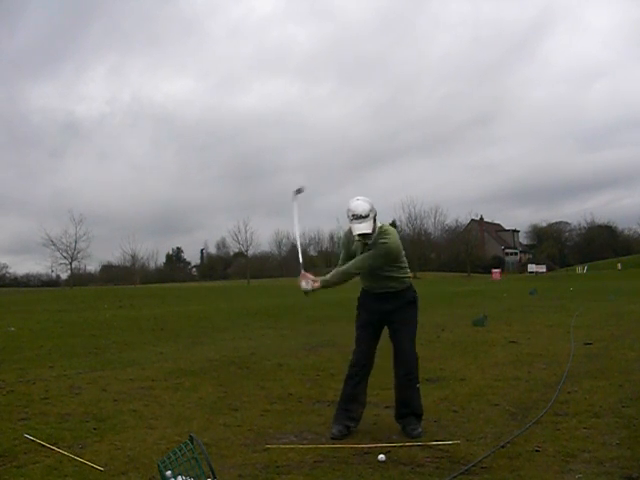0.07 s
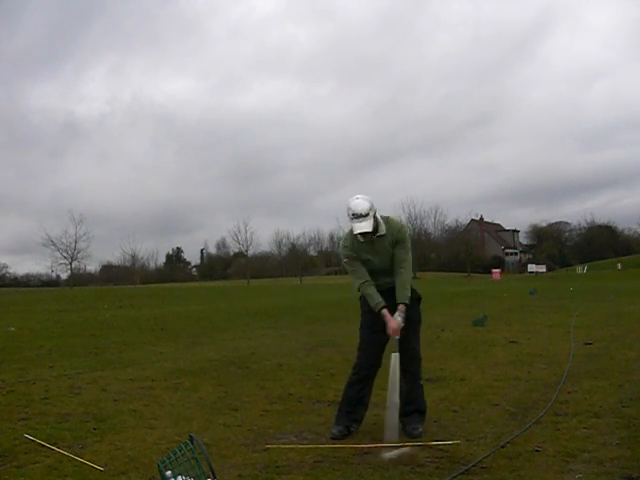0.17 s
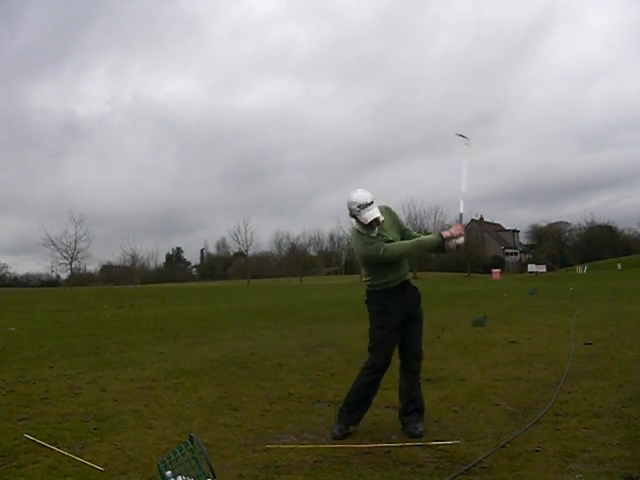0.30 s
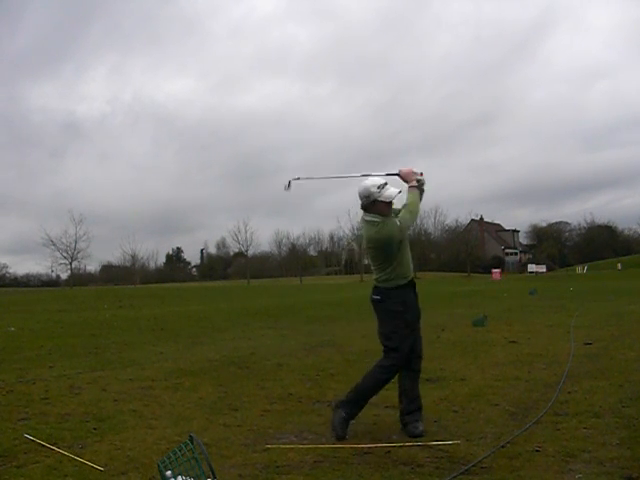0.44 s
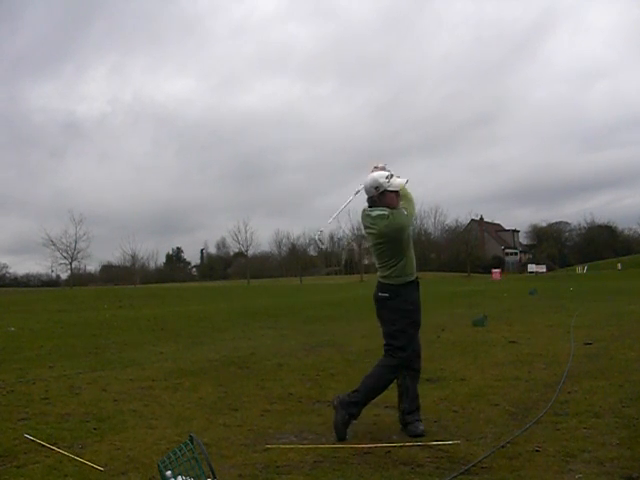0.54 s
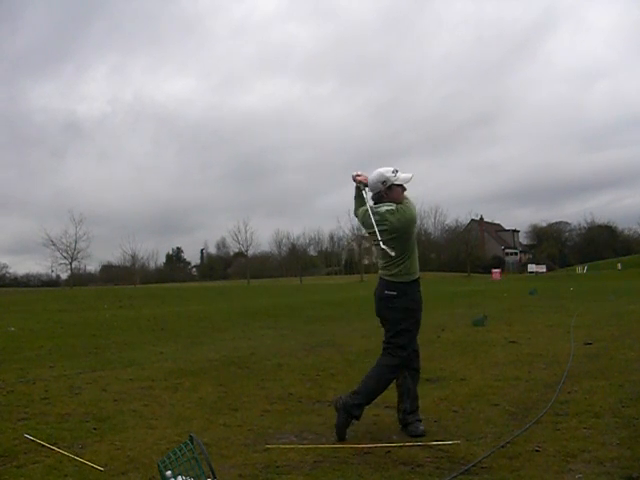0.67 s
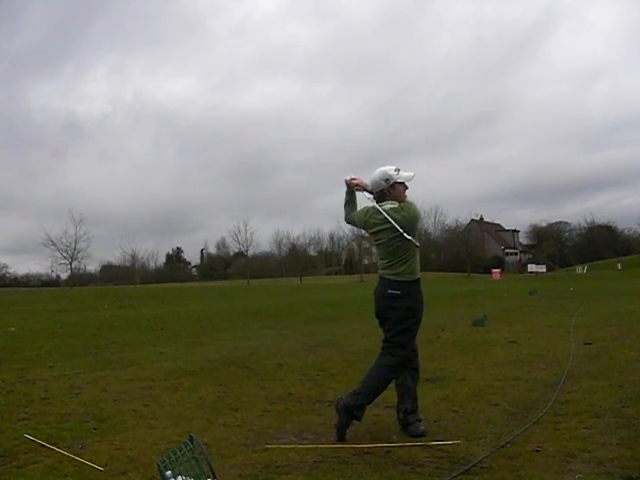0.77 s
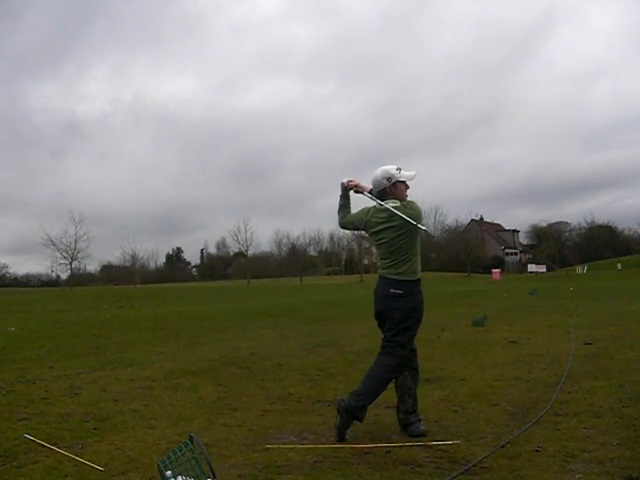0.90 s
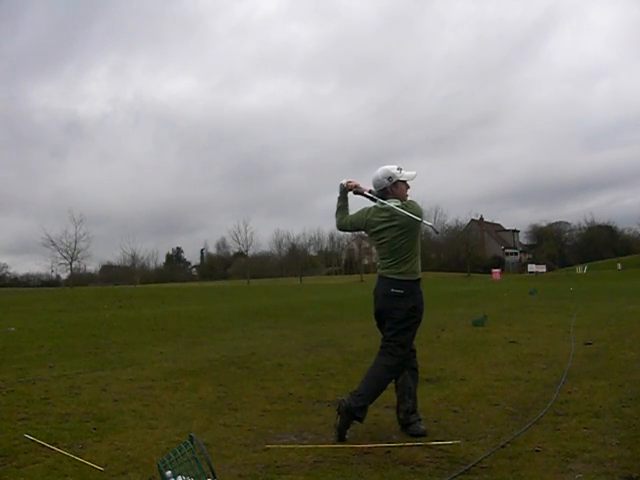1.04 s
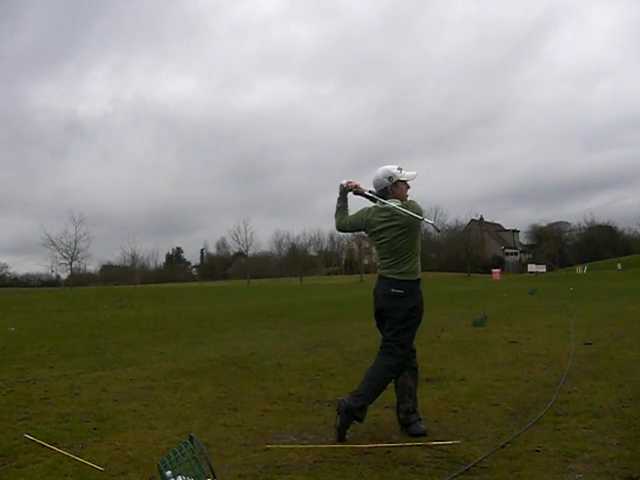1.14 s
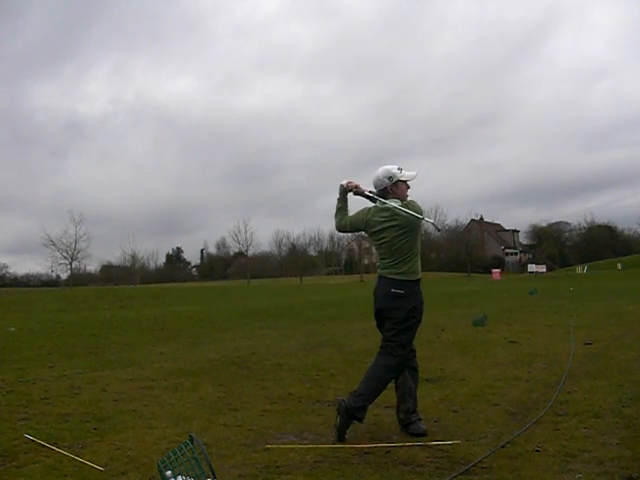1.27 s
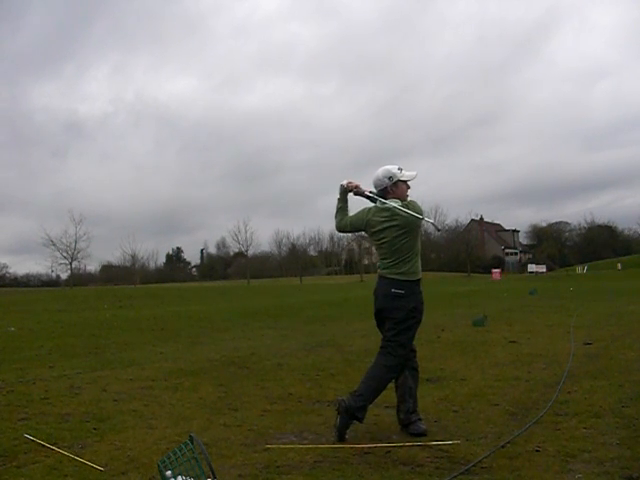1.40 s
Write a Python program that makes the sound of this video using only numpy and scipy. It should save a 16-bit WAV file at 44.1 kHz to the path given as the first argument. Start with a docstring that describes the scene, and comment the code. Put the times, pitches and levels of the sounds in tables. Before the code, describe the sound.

A golf iron whooshes quickly downward, strikes the ball with one loud dry crack and a brief metallic click, and scatters turf; then only low airy wash and barely audible birds, close microphone on an open range.

```python
"""An open range, small camera close to the player: a far wash of air in light wind and a faint camera whine.
A far tick, then an iron club swishes down: noise in tone, overtone and hiss that grows with speed.
Knocks ring the club head and shaft, the ball cracks off the face as one short wavelet with a bright spit,
and torn turf flies as grains of noise. The camera's gain control ducks after the crack and creeps back up.
From about a second in, small birds whistle far off as gliding sines, around a second faint tick."""
import sys
import numpy as np
from scipy import signal
from scipy.fft import rfft, irfft
from scipy.io import wavfile
from scipy.ndimage import uniform_filter1d

SR = 44100
rng = np.random.default_rng(int(sys.argv[2]) if len(sys.argv) > 2 else 0)


def dump(signal):
    """Clip the signal to [-1, 1] and save it as 16-bit WAV at the path in sys.argv[1]."""
    limited = np.clip(np.atleast_2d(signal).T, -1, 1)
    pcm = np.round(limited * 32767).astype(np.int16)
    wavfile.write(sys.argv[1], SR, pcm)


def invert_db(level):
    """Linear amplitude ratio for a level in decibels (20 dB per decade), elementwise."""
    return 10 ** (np.asarray(level, dtype=float) / 20)


N = 63945  # length in samples
T = np.arange(N) / SR  # time in seconds
HIT_S = .21004  # club face meets ball
RADIATES_ABOVE_HZ = 805  # club and crack are thinned below this


def evened(x):
    """Scales to rms 1."""
    return x / np.sqrt(np.mean(x ** 2) + 1e-20)


def read(points, hz):
    """Reads a spectrum table on a log-frequency axis."""
    table_hz, value = np.transpose(points)
    return np.interp(np.log(hz + 1), np.log(table_hz + 1), value)


def coloured(x, points):
    """Filters by a spectrum table, then scales to rms 1."""
    gain = invert_db(read(points, np.fft.rfftfreq(len(x), 1 / SR)))
    return evened(irfft(rfft(x) * gain, len(x)))


def resonate(x, hz, width_hz):
    """A resonance that may follow a moving frequency: shift down to 0 Hz, smooth, shift back."""
    turn = np.exp(2j * np.pi * np.cumsum(hz * np.ones(len(x))) / SR)
    r = np.exp(-np.pi * width_hz / SR)
    return 2 * (turn * signal.lfilter([1 - r], [1, -r], x / turn)).real


def dying(start_s, t60_s, rise_s):
    """Envelope: short straight rise under an exponential fall of 60 dB in t60_s."""
    t = np.maximum(T - start_s, 0)
    return np.minimum(t / rise_s, 1) * invert_db(np.maximum(-60 * t / t60_s, -200))


# far air over the open range, heaviest in the bass: pitch_hz, relative level_db
WASH_SPECTRUM = [(12, -30.5), (25, -9.5), (40, -7), (62, -3), (95, 0), (160, -2), (250, -5), (400, -10),
                 (630, -14), (1000, -15.5), (2500, -23), (5000, -27.5), (8000, -35.5), (10000, -41.5),
                 (13000, -49), (16000, -53)]


def wash():
    """Far wash of air: random short-time spectra whose patches drift gently in level, then coloured."""
    wash_db, patch_rms_db = -45, 0.4646
    frames = N // 256 + 5
    real, imaginary, patches = rng.standard_normal((frames, 513, 3)).T
    patches = uniform_filter1d(patches, size=10, axis=0)  # across frequency
    patches = evened(uniform_filter1d(patches, size=12, axis=1))  # across time
    spectra = (real + 1j * imaginary) * invert_db(patch_rms_db * patches)
    air = signal.istft(spectra, nperseg=1024, noverlap=768)[1][:N]
    return invert_db(wash_db) * coloured(air, WASH_SPECTRUM)


def whine():
    """A steady high tone from the camera itself, its level beating lightly."""
    whine_hz, whine_db, beat_hz, beat_depth = 14390, -87, 30, .3
    beat = 1 + beat_depth * np.sin(2 * np.pi * beat_hz * T)
    return np.sqrt(2) * invert_db(whine_db) * beat * np.sin(2 * np.pi * whine_hz * T)


# faint ticks far from the microphone: start_s, level_db (before the envelope), pitch_hz
FAR_TICKS = [(0.025, -47.5, 3780), (1.196, -51.5, 4400)]


def ticks():
    """Small far ticks: noise through a broad resonance, dying at once."""
    width_hz, t60_s, rise_s = 2340, 0.0343, 0.0013
    out = np.zeros(N)
    for start_s, level_db, pitch_hz in FAR_TICKS:
        noise = resonate(rng.standard_normal(N), pitch_hz, width_hz)
        noise = evened(resonate(noise, pitch_hz, width_hz))
        out += invert_db(level_db) * dying(start_s, t60_s, rise_s) * noise
    return out


# club head speed through the downswing and follow-through: time_s, speed (share of nominal top speed)
SWING_SPEED = [(.1, 0.24), (.145, 0.35), (.162, 0.847), (.185, 0.973), (.192, 1.01), (.207, 0.926),
               (.23, 0.786), (.26, 0.682), (.32, 0.16)]
# hiss of air off the moving club: pitch_hz, relative level_db
SWISH_SPECTRUM = [(500, -8.5), (1500, 0), (3000, -2.5), (6000, -7.5), (10000, -17.5), (16000, -29.5)]


def swing():
    """Air shed by the shaft: a fuzzy tone and a wide overtone that rise with speed, and hiss; all grow with it."""
    # levels hold at speed share 1; each power is how steeply the amplitude grows with speed
    shaft_hz, shaft_width_hz, shaft_db, shaft_power = 531.8, 101, -38, 2.85
    overtone_ratio, overtone_width_hz, overtone_db, overtone_power = 2.025, 327, -45.5, 1.84
    swish_db, swish_power = -49, 5.86
    speed = np.clip(np.interp(T, *np.transpose(SWING_SPEED), left=0, right=0), 0, 2)
    tone_noise, overtone_noise, hiss_noise = rng.standard_normal((N, 3)).T
    tone_hz = shaft_hz * speed
    tone = resonate(tone_noise, tone_hz, shaft_width_hz)
    tone = evened(resonate(tone, tone_hz, 2 * shaft_width_hz))
    overtone_hz = overtone_ratio * tone_hz
    overtone = resonate(overtone_noise, overtone_hz, overtone_width_hz)
    overtone = evened(resonate(overtone, overtone_hz, overtone_width_hz))
    hiss = coloured(hiss_noise, SWISH_SPECTRUM)
    return (invert_db(shaft_db) * speed ** shaft_power * tone
            + invert_db(overtone_db) * speed ** overtone_power * overtone
            + invert_db(swish_db) * speed ** swish_power * hiss)


# ringing modes of the club head and shaft: pitch_hz (before detuning), relative level_db, t60_s
CLUB_MODES = [(841, -10, 0.0246), (1003, -13, 0.0128), (1293, -14, 0.0162), (1491, -4.5, 0.0171),
              (2108, -8, 0.0118), (2586, -10, 0.0146), (2891, -4.5, 0.0133), (3400, -8, 0.0157),
              (4080, -14.5, 0.013), (4765, -4, 0.0245), (5118, -6.5, 0.016), (5510, -7, 0.0147),
              (6205, -6, 0.0112), (7386, -11, 0.0156)]
# grass tips, the ball, then the sole on the turf: start_s, relative level_db, low_share (of the lower modes)
CLUB_KNOCKS = [(.2086, -42.5, 0.55), (.2104, -27.5, 0.123), (.2110, -27, 0.102), (.2120, -23, 0.572),
               (0.2131, -21.5, 0.507), (.2139, -22.5, 0.68), (.2170, -27, 0.13)]


def club():
    """Every knock starts all the modes together, pushing inward first; the small head radiates little bass."""
    detune_spread, low_below_hz = 0.0082, 3600
    pitch_hz, level_db, t60_s = np.transpose(CLUB_MODES)[:, :, None]
    t = T[:4000]
    out = np.zeros(N)
    detune = 1 + detune_spread * rng.standard_normal((len(CLUB_KNOCKS), len(CLUB_MODES), 1))
    for (start_s, knock_db, low_share), bend in zip(CLUB_KNOCKS, detune):
        low_share = np.clip(low_share, 0, 1)
        share = np.where(pitch_hz < low_below_hz, low_share, 1 - low_share)
        modes = share * invert_db(level_db - 60 * t / t60_s) * np.sin(2 * np.pi * pitch_hz * bend * t)
        out[round(start_s * SR):][:len(t)] -= 2 * invert_db(knock_db) * modes.sum(0)
    return signal.lfilter(*signal.butter(2, RADIATES_ABOVE_HZ, 'high', fs=SR), out)


# bright spit of noise at contact: pitch_hz, relative level_db
SNAP_SPECTRUM = [(3000, -15.5), (6000, 5), (9500, 7), (13000, -4.5), (16000, -16.5)]


def crack():
    """The ball squashes on the face: one short wavelet sagging in pitch, thin in the bass, and a bright spit."""
    crack_db, crack_hz, sag_hz_per_s, width_s = 4, 3012, 4870000, 0.000164  # level before bass thinning
    snap_db, snap_t60_s = -12, 0.00758  # level before the envelope
    t = T - HIT_S
    sagging_tone = -np.sin(2 * np.pi * (crack_hz * t - .5 * sag_hz_per_s * t ** 2))
    wavelet = sagging_tone * np.exp(-.5 * (t / width_s) ** 2)
    wavelet = signal.filtfilt(*signal.butter(2, RADIATES_ABOVE_HZ, 'high', fs=SR), wavelet)
    spit = coloured(rng.standard_normal(N), SNAP_SPECTRUM) * dying(HIT_S - .0004, snap_t60_s, .0003)
    return invert_db(crack_db) * wavelet + invert_db(snap_db) * spit


# torn turf and flying grit: pitch_hz, relative level_db
TURF_SPECTRUM = [(400, -26), (900, -7.5), (2000, -11), (3200, -2), (5000, 1.5), (7500, -9.5), (11000, -17),
                 (13500, -16.5), (16000, -31.5)]
# loose soil flying off, duller: pitch_hz, relative level_db
SPRAY_SPECTRUM = [(500, -23.5), (1500, -4), (3200, 3.5), (5000, -1), (7000, -12), (10000, -29.5),
                  (16000, -37)]


def turf():
    """A quick burst of random grit grains, with a softer, duller spray that dies more slowly."""
    start_s, grains_per_s, spread_db = .2106, 7800, 2
    turf_db, turf_t60_s, spray_db, spray_t60_s = -21.5, 0.0414, -33.5, 0.132  # levels before the envelopes
    grit = rng.standard_normal(N)
    grit = grit * (rng.random(N) < grains_per_s / SR)  # keep scattered grains only
    grit = grit * invert_db(spread_db * np.minimum(rng.exponential(1, N), 4))  # uneven sizes
    burst = dying(start_s, turf_t60_s, 0.00078) * coloured(grit, TURF_SPECTRUM)
    # the same grains backwards serve as fresh ones
    spray = dying(start_s, spray_t60_s, .004) * coloured(grit[::-1], SPRAY_SPECTRUM)
    return invert_db(turf_db) * burst + invert_db(spray_db) * spray


# small birds far across the range: start_s, length_s, level_db, pitch_hz (at the start), glide_hz_per_s
BIRD_CALLS = [(1.007, 0.0956, -59, 4427, -1750), (1.024, 0.0276, -58.5, 2227, 2500.5),
              (1.185, 0.023, -62.5, 4325, -3000), (1.412, 0.039, -60, 4473, -2800)]


def birds():
    """Thin far whistles: gliding sines that swell and fade."""
    out = np.zeros(N)
    for start_s, length_s, level_db, pitch_hz, glide_hz_per_s in BIRD_CALLS:
        t = np.clip(T - start_s, 0, length_s)
        swell = abs(np.sin(np.pi * t / length_s)) ** 0.47
        whistle = np.sin(2 * np.pi * (pitch_hz * t + .5 * glide_hz_per_s * t ** 2))
        out += np.sqrt(2) * invert_db(level_db) * swell * whistle
    return out


def scene():
    """All sources at the one microphone."""
    shot = crack() + club() + turf() + swing()
    background = wash() + birds() + ticks() + whine()
    return (shot + background)[None]


def top_cut(x):
    """Nothing passes above the cut-off."""
    return signal.sosfilt(signal.butter(12, 16480, fs=SR, output="sos"), x)


def record(dry):
    """The camera's gain control falls just after a loud peak and recovers slowly; its input stage saturates."""
    duck_from_db, duck_share, smoothing_s, recover_db_per_s = -15.5, 0.5273, 0.0133, 2.5
    saturates_at = 0.71
    power_db = 10 * np.log10(abs(uniform_filter1d(dry[0] ** 2, size=64)) + 1e-12)
    recovery_db = T * recover_db_per_s
    # hold the deepest duck so far, less the recovery since then
    held_db = np.maximum.accumulate(duck_share * (power_db - duck_from_db) + recovery_db)
    duck_db = np.maximum(held_db - recovery_db, 0)
    r = np.exp(-1 / (smoothing_s * SR))
    ducked = dry / invert_db(signal.lfilter([1 - r], [1, -r], duck_db))
    saturated = ducked / (1 + abs(ducked / saturates_at) ** 4) ** 0.273
    return top_cut(saturated)


dry = scene()
out = record(dry)
dump(out)
```